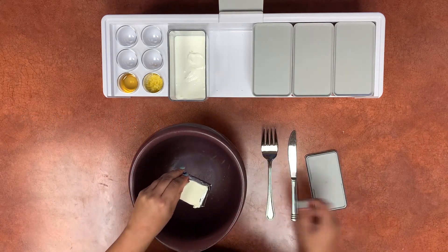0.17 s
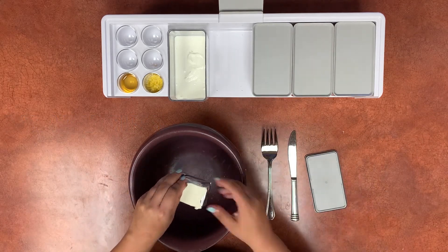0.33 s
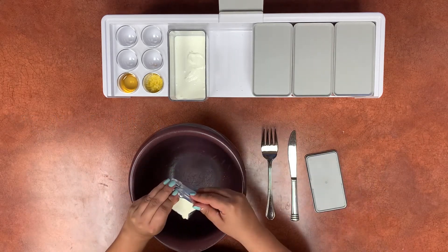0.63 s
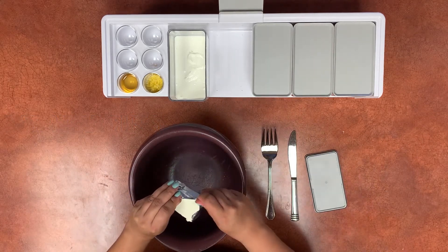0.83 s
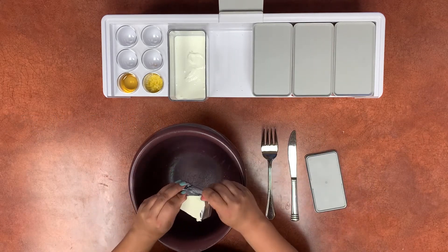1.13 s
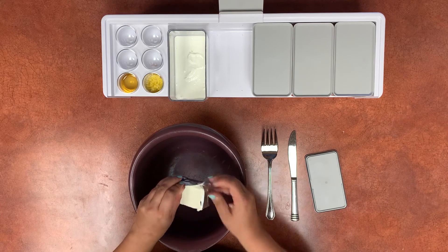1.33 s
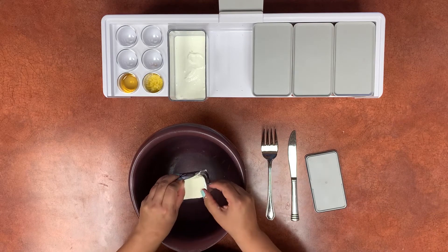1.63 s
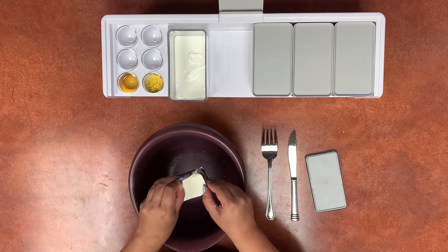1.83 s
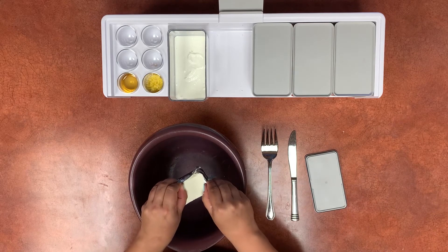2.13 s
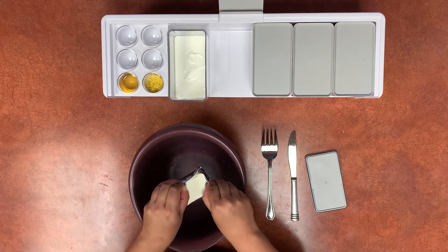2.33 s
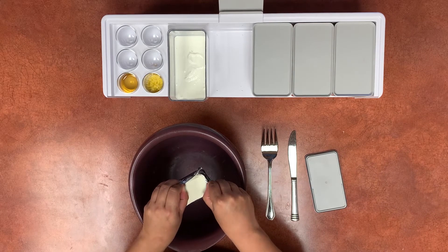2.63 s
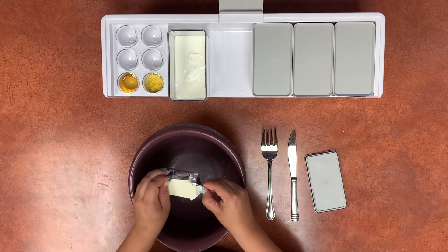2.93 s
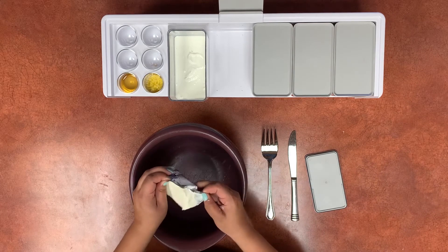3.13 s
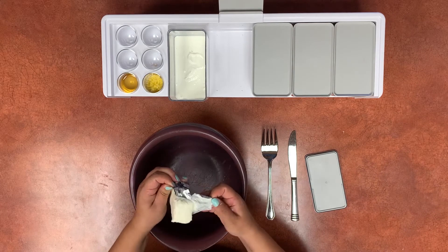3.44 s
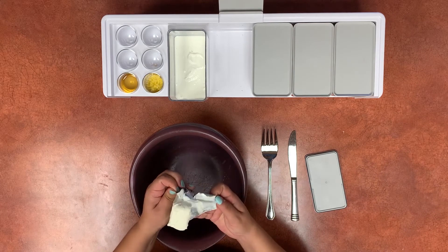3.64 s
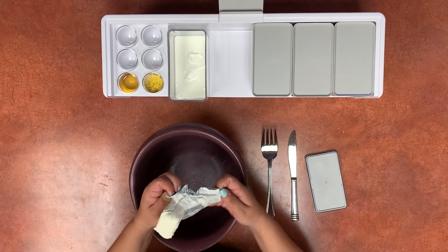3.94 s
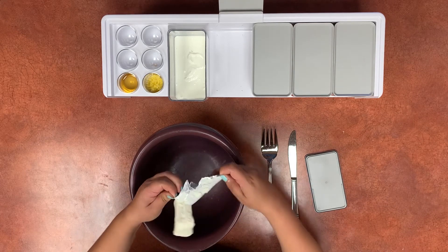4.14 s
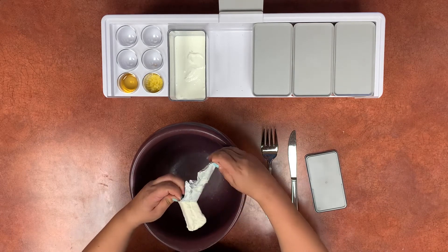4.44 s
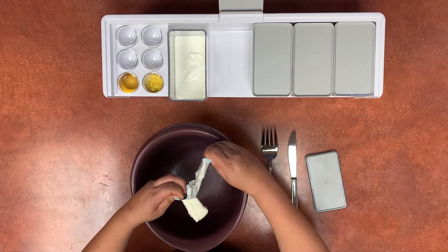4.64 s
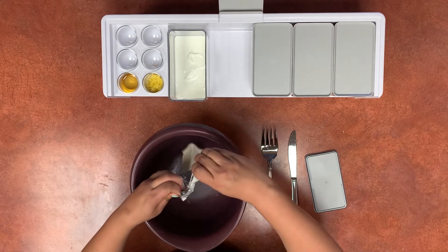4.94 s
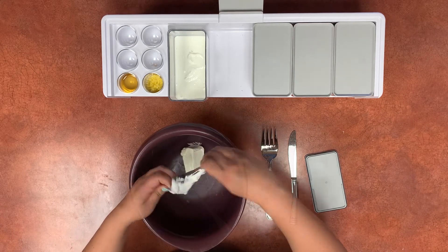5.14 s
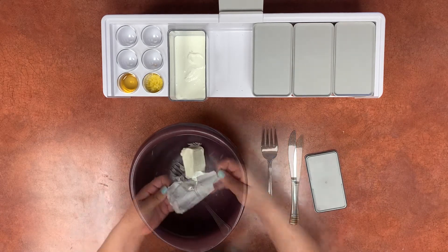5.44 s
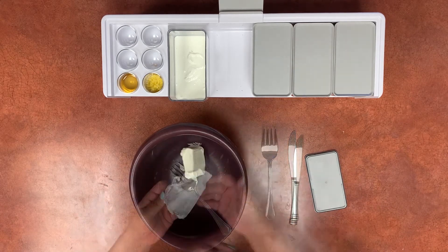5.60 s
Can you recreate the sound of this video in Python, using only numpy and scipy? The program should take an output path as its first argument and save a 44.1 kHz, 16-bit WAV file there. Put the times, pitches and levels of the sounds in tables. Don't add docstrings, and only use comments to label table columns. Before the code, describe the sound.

A deep ventilation drone near 60 Hz, with low roar and soft airy wash, runs throughout, pumped unevenly by a noise gate: fuller around 0.5-0.9, 2.2 and 3.5 s, with abrupt dips. Foil close to the microphone rustles softly for the first 0.15 s, then gives only tiny ticks near 0.5, 0.7 and 1.1 s and very faint ones until 2.8. A distant motor hum rises in pitch at 2.4-2.65 s. At 2.92 a crisp snap starts the unwrapping; bright crinkles follow at 3.3 and clustered crackles from 3.45 to 3.9. Separate peeling snaps come from 4.1, with a dull bowl knock at 4.4. From 4.73 to 5.02 the foil tears in a dense, loud crackle. Heavier muffled thuds and snaps peak around 5.0-5.2, then thin out by 5.4 as the motor hum returns faintly. Small last crinkles come at 5.49 and 5.75. Short, fairly dry room reflections.

```python
import sys
import numpy as np
from scipy import signal
from scipy.fft import rfft, irfft, next_fast_len
from scipy.io import wavfile
from scipy.ndimage import uniform_filter1d

SR = 44100
rng = np.random.default_rng(int(sys.argv[2]) if len(sys.argv) > 2 else 0)


def bounce(signal):
    frames = np.transpose(np.atleast_2d(signal))
    limited = np.clip(frames, -1, 1)
    pcm = np.round(limited * 32767).astype(np.int16)
    wavfile.write(sys.argv[1], SR, pcm)


def gain_from_db(level_db):
    decades = np.asarray(level_db, float) / 20
    return 10 ** decades


N = 254456

# start_s, peak_db, brightness_db, panel_ring_hz
TEAR = [(4.7332, -28, -10, 3210), (4.7655, -14, -22, 3250), (4.783, -11, -16.5, 3180),
        (4.7957, -11, -8, 3200), (4.8045, -7, -25, 3230), (4.821, -7, -17.5, 3320),
        (4.868, -11.5, -17, 3200), (4.8822, -0.5, -9.5, 3220), (4.884, -10.5, -25, 1730),
        (4.9059, -15, 2.5, 3270), (4.913, -9, 1, 3300), (4.9291, -10, 0, 2320), (4.9391, 1, -19, 3070),
        (4.94, -0.5, -30, 1750), (4.942, -2.5, -28, 2400), (4.947, -14, -18, 1780), (4.957, -18, -15, 2880),
        (4.9665, -7, -9.5, 1730), (4.976, -26, 0, 2000), (4.984, -5.5, -23, 2140), (4.996, -13, -18, 2350),
        (5.005, -8, -36, 1210), (5.023, -13, -29, 2700)]


def evened(x):
    return x / np.sqrt(np.mean(x ** 2) + 1e-20)


def read(points, hz):
    f, value = np.transpose(points)
    return np.interp(np.log(hz + 1), np.log(f + 1), value)


def follow(rows):
    s, *columns = np.transpose(rows)
    return [np.interp(np.arange(N) / SR, s, c) for c in columns]


def shape(x, gain):
    size = next_fast_len(len(x))
    spectrum = rfft(x, size) * gain(np.fft.rfftfreq(size, 1 / SR))
    return irfft(spectrum, size)[:len(x)]


def resonate(x, hz, width_hz):
    pole = np.exp((2j * np.pi * hz - np.pi * width_hz) / SR)
    return 2 * signal.lfilter([1 - abs(pole)], [1, -pole], x).real


def smooth(x, size, axis=-1):
    return uniform_filter1d(x, size=size, axis=axis)


def drift(span):
    return evened(smooth(smooth(rng.standard_normal(N), span), span))


def gate():
    # time_s, drone_level_db
    opening = [(0.0, -31.5), (0.39, -29), (0.45, -18.5), (0.75, -18), (1.12, -23.5), (1.56, -29.5),
               (2.22, -12), (2.7, -27), (2.81, -22.5), (3.2, -35.5), (3.46, -10.5), (3.76, -10),
               (4.1, -22.5), (4.5, -23.5), (5.06, -12.5), (5.35, -15.5), (5.45, -24), (5.77, -24.5)]
    # time_s, change_db, closing_s
    snaps_shut = [(0.091, 13.5, 0.077), (0.17, -4, 0.025), (0.36, -4, 0.12), (0.511, -13, 0.024),
                  (0.573, -12, 0.037), (0.98, -11, 0.029), (1.348, -12.5, 0.11), (1.681, -26, 0.062),
                  (2.3, 4, 0.051), (2.95, -7, 0.061), (3.238, -17, 0.06), (3.633, -19.5, 0.094),
                  (3.819, -11, 0.055), (3.996, -17, 0.06), (4.282, -16.5, 0.083), (4.488, -21, 0.015),
                  (4.569, -16, 0.04), (4.664, -23.5, 0.028), (5.768, 16.5, 0.009)]
    reopen = 0.74
    t_s = np.arange(N) / SR
    shuts_db = np.zeros(N)
    for s, db, closing_s in snaps_shut:
        shuts_db += db * np.interp(t_s, [s - closing_s, s, s + reopen * closing_s], [0, 1, 0])
    return follow(opening)[0] + 25, shuts_db


def rumble():
    # freq_hz, density_db_per_hz
    roar_colour = [(50, 0), (75, 12), (100, 12), (160, 5), (210, -10), (300, -56)]
    # freq_hz, density_db_per_hz
    wash_colour = [(120, -9.5), (200, -7), (374, -4.5), (487, -13.5), (580, -15), (634, -16), (970, -19.5),
                   (1100, -21), (1220, -18.5), (1330, -23.5), (1620, -29.5), (2000, -40.5), (4000, -71),
                   (5200, -104), (8800, -120)]
    # freq_hz, width_hz, level_under_wash_db
    fan = [(249, 3.8, -15.5), (379.3, 10.4, -13), (580, 0.88, -18), (827.4, 7.8, -17.5), (933, 7.5, -20)]
    drone_hz, wander_hz = 59.53, 3.14
    slow_db, shuts_db = gate()
    drone_db = slow_db + shuts_db - 27
    roar_db = -28.5 + 0.58 * slow_db + 0.68 * shuts_db
    wash_db = -32.5 + 0.44 * slow_db + 0.57 * shuts_db
    noise = rng.standard_normal(N)
    cycles = np.cumsum(drone_hz + wander_hz * drift(span=1500)) / SR
    drone = np.sqrt(2) * np.sin(2 * np.pi * cycles)
    drone += gain_from_db(-9.5) * evened(resonate(resonate(noise, 56.0, 52), 57.0, 53))
    roar = evened(shape(noise, lambda hz: gain_from_db(read(roar_colour, hz))))
    wash = evened(shape(noise, lambda hz: gain_from_db(read(wash_colour, hz))))
    wash += sum(gain_from_db(db) * evened(resonate(noise, hz, width_hz)) for hz, width_hz, db in fan)
    lumpy_db = 2.27 * drift(span=900)
    return gain_from_db(drone_db + 1.0) * drone + gain_from_db(roar_db + 3.0) * roar + gain_from_db(wash_db + lumpy_db + 3.5) * wash


def bands(x):
    edges_hz = [700, 1900, 4500, 8600, 15500]
    filters = [signal.butter(3, edge, "band", fs=SR, output="sos") for edge in zip(edges_hz, edges_hz[1:])]
    return [signal.sosfilt(sos, x) for sos in filters]


def hollow(x):
    # freq_hz, width_hz, level_db
    bowl = [(1070, 13, -26), (1740, 150, 9.5), (2400, 1330, 1.5), (3230, 275, 5.5)]
    return x + gain_from_db(-8.5) * sum(gain_from_db(db) * resonate(x, hz, width_hz) for hz, width_hz, db in bowl)


def patchy(x, patchy_db):
    z = signal.stft(x, nperseg=256)[2]
    chance = rng.standard_normal(z.shape[::-1]).T
    patches = smooth(smooth(chance, 3, axis=0), 5, axis=1)
    return signal.istft(z * gain_from_db(patchy_db * evened(patches)), nperseg=256)[1][:N]


def handling():
    # start_s, hold_s, rustle_db, brightness_db, fade_db_per_s
    fidgets = [(-0.05, 0.091, -21.5, -7.5, 178), (0.037, 0.063, -24, -12, 400), (0.302, .01, -59, -14, 300),
               (0.462, .01, -50, -24, 452), (0.43, .04, -75, -4, 100), (0.61, .1, -77, 15.5, 100),
               (0.713, 0.042, -58, 10, 248), (0.85, 0.0092, -61.5, 8, 147), (0.892, 0.15, -48.5, -26, 900),
               (1.087, 0.0079, -41.5, -15, 117), (1.243, 0.0053, -62.5, 12, 300), (1.435, .01, -70, 10, 68),
               (1.736, .01, -56, -27, 74), (2.048, .2, -73, -12, 53), (2.576, .01, -86, 0, 44),
               (2.77, .01, -70, 12.5, 88)]
    # start_s, hold_s, rustle_db, brightness_db, fade_db_per_s
    pulls = [(2.95, 0.033, -48.5, -4.5, 111), (3.12, 0.011, -51.5, -1, 152), (3.273, .02, -52, 17, 150),
             (3.301, 0.01, -34, 11.5, 232), (3.392, 0.1, -37.5, -10.5, 56), (3.632, 0.27, -38, -10.5, 277),
             (4.125, 0.0029, -24, -3.5, 1100), (4.167, .01, -59.5, 2, 70), (4.394, 0.0046, -33.5, -18, 305),
             (4.533, 0.0039, -34.5, -7, 695), (4.584, .08, -55, -10, 200), (4.356, 0.024, -47, -5.5, 100),
             (4.704, .04, -48, 0, 105), (4.767, .03, -33.5, -9, 200), (4.819, 0.017, -26, -20, 542),
             (4.88, .02, -43, -14, 105), (4.905, 0.017, -29.5, 1.5, 106), (4.948, .045, -36, -1, 135),
             (5.123, 0.052, -26, -14, 138), (5.23, 0.11, -41, -27, 65), (5.486, .02, -57, -25, 92),
             (5.726, .03, -50, 10, 100), (5.765, .01, -35.5, -1, 100)]
    # level_db, share_of_rustle, share_of_brightness
    sheens = [(-3.5, 0.73, -0.17), (-1, 0.86, 0.3), (-1, 1.0, 0.78), (5, 1.0, 1.34)]
    resting_db = [-81, -87, -87, -61]
    greasy_db = [
        [-2],
        [2],
        [-4.5],
        [-12],
    ]
    swell_db_per_s = 1506
    t_s = np.arange(N) / SR
    slow_db, shuts_db = gate()
    level = gain_from_db(np.array(resting_db)[:, None] + 0.34 * (slow_db + shuts_db) + 3.1 * drift(span=1200))
    own_db, share, shine = np.transpose(sheens)[..., None]
    for s, hold_s, db, bright_db, fade in [*fidgets, *pulls]:
        swell_db = swell_db_per_s * np.maximum(s - t_s, 0)
        fade_db = abs(fade) * np.maximum(t_s - s - hold_s, 0)
        now_db = db - swell_db - fade_db
        loss_db = (s > TEAR[0][0]) * np.array(greasy_db)
        level = np.maximum(level, gain_from_db(own_db + share * now_db + shine * bright_db + loss_db))
    return level


def rustle():
    clumps = gain_from_db(4.1 * drift(span=150))
    size = gain_from_db(3.2 * np.minimum(rng.exponential(1, N), 5)) * rng.choice([-1., 1.], N)
    struck = rng.random(N) < 3500 * clumps / SR
    grains = evened(size * struck) + 0.73 * rng.standard_normal(N)
    grains = patchy(grains, patchy_db=2.0)
    levels = handling()
    low, body, middle, top = (gain_from_db(-4.0) * level * evened(part) for level, part in zip(levels, bands(grains)))
    return low + hollow(body) + middle + top


def creases():
    # start_s, peak_db, brightness_db, panel_ring_hz
    lift = [
        (0.48, -45.5, 4.5, 1510),
        (0.7138, -54, -2, 1780),
        (0.723, -50, 8, 1640),
        (1.2437, -59, -7, 1530),
        (2.4496, -56, 1, 2270),
        (2.763, -47, 1, 1500),
    ]
    # start_s, peak_db, brightness_db, panel_ring_hz
    unfold = [(2.9222, -16, -9.5, 3270), (2.9236, -21.5, -11, 2300), (2.986, -28, -16, 3500),
              (3.105, -38, -9, 1500), (3.1268, -31, -6, 2220), (3.256, -57, 11, 1500),
              (3.277, -42.5, 15, 1780), (3.293, -30, -12, 2810), (3.303, -24, -8, 3050),
              (3.3102, -15.5, -3, 3120), (3.4531, -21.5, -19, 1560), (3.4757, -23, -23, 1800),
              (3.5224, -49, -13, 1610), (3.561, -27, -23, 1500), (3.581, -57, 1, 1550),
              (3.6242, -48, 14.5, 1610), (3.6362, -46, 15, 1500), (3.666, -11, -53, 2670),
              (3.683, -20.5, -34, 3370), (3.7123, -15.5, -21, 1670), (3.772, -23.5, -25, 1920),
              (3.8094, -39, -8, 1530), (3.829, -15, -7, 1680), (3.8464, -10.5, -38, 3430),
              (3.898, -19.5, -20, 3250)]
    # start_s, peak_db, brightness_db, panel_ring_hz
    peel = [(4.106, -29, -13, 1740), (4.124, -18, -0.5, 1360), (4.193, -28.5, -19, 3530),
            (4.222, -40, -16, 3520), (4.343, -36, -7, 1560), (4.3937, -10, -29, 1700),
            (4.4054, -12.5, -17.5, 2070), (4.4546, -20, -22, 1600), (4.5322, -18, -3.5, 3830),
            (4.540, -24.5, -6.5, 3660), (4.6075, -20, -24, 1740), (4.6332, -17.5, -27, 3510)]
    # start_s, peak_db, brightness_db, panel_ring_hz
    slacken = [(5.1183, -1, -34, 1880), (5.138, -16, -16, 990), (5.151, -10, -15, 2880),
               (5.1634, -5.5, -19.5, 1570), (5.18, -22, -23, 2770), (5.192, -8.5, -34, 1600),
               (5.2376, -13.5, -29, 1800), (5.2511, -15.5, -27, 1760), (5.298, -25, -25, 2540),
               (5.309, -21, -27, 1400), (5.3265, -18.5, -19, 3230), (5.3524, -18.5, -22, 1870),
               (5.369, -20, -25, 2110), (5.427, -48, -25, 1800), (5.4867, -17, -17.5, 2850),
               (5.511, -40, -23, 2970), (5.7234, -53, -11, 1600), (5.743, -23, -29, 3070)]
    sparkle_db = [8, -3, 4.5, -5.5, -6.5]
    out = []
    for rows, top_db in zip([lift, unfold, peel, TEAR, slacken], sparkle_db):
        out += [(s, db, 0, bright_db, bright_db + top_db, hz) for s, db, bright_db, hz in rows]
    return out


def snaps():
    # start_s, peak_db
    pricks = [
        (3.478, -26),
        (3.5237, -23),
        (3.582, -19.5),
    ]
    panel_width_hz = 270
    drive = np.zeros((4, N + 2000))
    t_s = np.arange(-400, 1600) / SR
    release = np.exp(-abs(t_s) / 0.002) + 0.8 * np.exp(-abs(t_s) / 0.0003)
    lead_in = 0.18 * np.exp(np.minimum(t_s, 0) / 0.01)
    envelope = np.where(t_s < 0, lead_in, release + 0.12 * np.exp(-abs(t_s) / 0.018))
    for s, db, body_db, middle_db, top_db, hz in creases():
        flurry = rng.standard_normal(2000) * envelope
        ring = resonate(flurry, hz, panel_width_hz)
        ringing = 0.65 * flurry + gain_from_db(-4.0) * ring / abs(ring).max()
        gains = gain_from_db(db + 3.0 + np.array([body_db, middle_db, top_db]))[:, None]
        at = round(s * SR) - 400
        drive[:3, at:at + 2000] += gains * np.array([ringing, flurry, flurry])
    for s, db in pricks:
        at = round(s * SR) - 400
        drive[3, at:at + 2000] += gain_from_db(db) * rng.standard_normal(2000) * envelope
    low, body = bands(drive[0, :N])[:2]
    middle, top = bands(drive[1, :N])[2], bands(drive[2, :N])[3]
    tiny = signal.sosfilt(signal.butter(3, 11800, "high", fs=SR, output="sos"), drive[3, :N])
    return gain_from_db(-5.5) * low + gain_from_db(-2.5) * hollow(body) + middle + top + gain_from_db(5.5) * tiny


def motor():
    # time_s, pitch_hz, level_db
    passes = [
        [(2.42, 149.4, -28), (2.546, 184.3, -28.5), (2.63, 193, -37)],
        [(5.25, 155, -27), (5.288, 151.9, -27.5), (5.77, 159, -32.5)],
    ]
    t_s, out = np.arange(N) / SR, np.zeros(N)
    for rows in passes:
        s, hz, db = np.transpose(rows)
        fade = np.clip(np.minimum(t_s - s[0], s[-1] + 0.039 - t_s) / 0.065, 0, 1)
        cycles = np.cumsum(np.interp(t_s, s, hz)) / SR
        out += fade * gain_from_db(np.interp(t_s, s, db) + 8.0) * np.sin(2 * np.pi * cycles)
    return out


def bumps():
    # start_s, peak_db
    knocks = [(4.394, -6.5), (4.965, -14.5), (4.984, -11), (5.006, -1), (5.118, 4), (5.134, 0), (5.16, -2),
              (5.176, -5), (5.194, -2), (5.288, -8), (5.317, -4)]
    # freq_hz, level_db, t60_s
    modes = [(322, -38, 0.069), (388, -4.5, 0.074), (452, 2, 0.062), (554, 4.5, 0.05), (602, -6, 0.09),
             (668, -3, 0.044), (806, -15, 0.016), (1131, -1.5, 0.049)]
    t_s, blows = np.arange(6000) / SR, np.zeros(N + 600)
    push = np.exp(-t_s[:600] / 0.0058)
    for s, db in knocks:
        at = round(s * SR)
        blows[at:at + 600] += gain_from_db(db - 22.0) * rng.standard_normal(600) * push
    wall = sum(gain_from_db(db - 60 * t_s / t60_s) * np.sin(2 * np.pi * hz * t_s) for hz, db, t60_s in modes)
    return signal.oaconvolve(blows, wall / abs(wall).max())[:N]


def tail(start_s, scale):
    # freq_hz, t60_s
    kitchen = [(300, 0.79), (2000, 0.75), (6000, 0.32), (14000, 0.048)]
    taps = np.zeros(SR // 4)
    at = np.arange(round(start_s * SR), SR // 4 - 12, 12)
    taps[at + rng.integers(0, 12, len(at))] = rng.choice([-1., 1.], len(at))
    hz, t_s, z = signal.stft(taps, SR, nperseg=128)
    t60_s = scale * read(kitchen, hz)[:, None]
    out = signal.istft(z * gain_from_db(-60 * t_s / t60_s), SR, nperseg=128)[1]
    return out / np.linalg.norm(out)


def foil():
    # freq_hz, gain_db
    sheen = [(700, 0), (3500, -5), (4500, -4.5), (6500, 7), (8300, 0), (10000, -2), (13000, -9.5),
             (16000, -7.5)]
    hits = snaps() + bumps()
    reflections = signal.oaconvolve(hits, tail(0.0036, 0.45))[:N]
    mix = rustle() + hits + gain_from_db(-9.0) * reflections
    return shape(mix, lambda hz: gain_from_db(read(sheen, hz)))


def ports(x, other, near_db, likeness, leads):
    # freq_hz, gain_db
    left_db = [(50, -4.4), (110, -5.5), (200, -8.5), (380, -10.5), (700, -6), (1300, -4.5), (2400, -2.5),
               (5000, -2), (15000, -2)]

    def same(hz):
        return np.clip(read(likeness, hz), 0, 1)

    def tilt(hz):
        return gain_from_db(read(left_db, hz) + near_db)

    def lead(hz):
        return np.exp(1j * np.interp(hz, *np.transpose(leads)))

    left = shape(x, lambda hz: same(hz) * tilt(hz) * lead(hz))
    left += shape(other, lambda hz: np.sqrt(1 - same(hz) ** 2) * tilt(hz))
    return np.array([left, x])


def scene():
    # freq_hz, coherence
    room_likeness = [(60, .99), (150, .96), (300, .7), (550, .45), (800, .7), (1200, .35), (2500, .55),
                     (4200, .92)]
    # freq_hz, coherence
    foil_likeness = [(60, .99), (300, .7), (550, .5), (1200, .68), (2500, .8), (4000, .88), (4850, .8),
                     (6500, .92), (15000, .9)]
    # freq_hz, lead_rad
    room_lead = [(0, 0), (250, .3), (690, 2.1), (1900, .8), (2600, 1.8), (3900, 1.7), (4850, 3.14),
                 (8900, 9.42), (16500, 20.2), (22050, 28)]
    # freq_hz, lead_rad
    foil_lead = [(0, 0), (250, .3), (690, 1.6), (1300, .8), (2600, 1.3), (3900, 1.7), (4850, 3.14),
                 (8900, 9.42), (16500, 20.2), (22050, 28)]
    near = ports(foil(), foil(), 0.04, foil_likeness, foil_lead)
    far = ports(rumble() + motor(), rumble(), 0, room_likeness, room_lead)
    return near + far


def thin_treble(x):
    edge_hz = 15850
    sum_difference = np.array([x[0] + x[1], x[0] - x[1]]) / 2
    hz, _, z = signal.stft(sum_difference, SR, nperseg=2048)
    power = abs(z[:, :1024].reshape(2, 64, 16, -1)) ** 2
    band_db = 10 * np.log10(power.mean(2) + 1e-20)
    middle_hz = hz[8:1024:16, None]
    gap_db = smooth(band_db[::-1] - band_db, 3, axis=2)
    loud_db = band_db[:, :12].max((0, 1))
    chance = rng.standard_normal(band_db.shape[:0:-1]).T
    whim_db = 3.2 * evened(smooth(smooth(chance, 4, axis=1), 4, axis=0))
    needed_db = np.clip(2 - 0.2 * (band_db.max(0) - loud_db), 5, 12) + 2 * (middle_hz < 6000) + whim_db
    weaker = (gap_db > needed_db) & (middle_hz > 4200)
    faint = (band_db.max(0) < loud_db - 56 + (middle_hz - 15000) / 250) & (middle_hz > 13000)
    z[:, :1024] *= np.repeat(np.where(weaker | faint, 0, 1), 16, axis=1)
    pricked = band_db[0, 44] > band_db[0, 29] + 2
    z[:, hz > edge_hz] *= gain_from_db(np.where(pricked, -12.0, -34.0))
    mid, side = signal.istft(z, SR, nperseg=2048)[1][:, :N]
    return np.array([mid + side, mid - side])


def roll_off(x):
    return signal.sosfilt(signal.butter(12, 16840, fs=SR, output="sos"), x)


def record(dry):
    cut = signal.sosfilt(signal.butter(2, 38, "high", fs=SR, output="sos"), dry)
    limited = np.tanh(cut / 1.3) * 1.3
    return roll_off(thin_treble(limited))


dry = scene()
out = record(dry)
bounce(out)
```